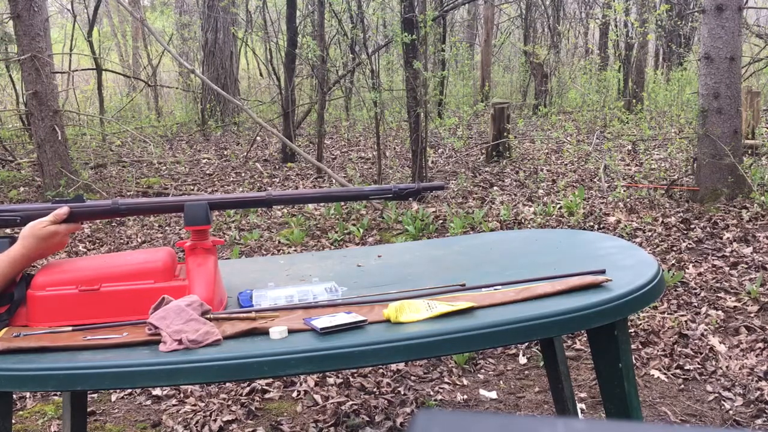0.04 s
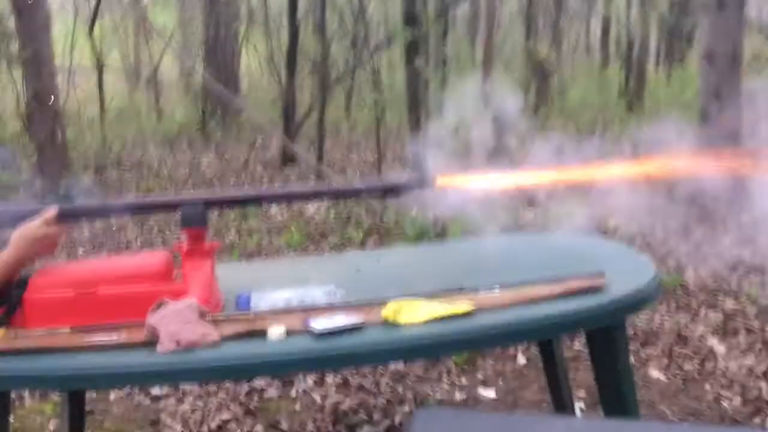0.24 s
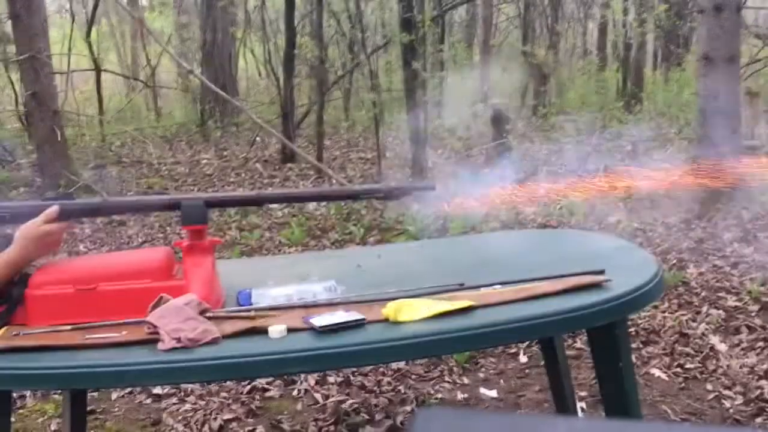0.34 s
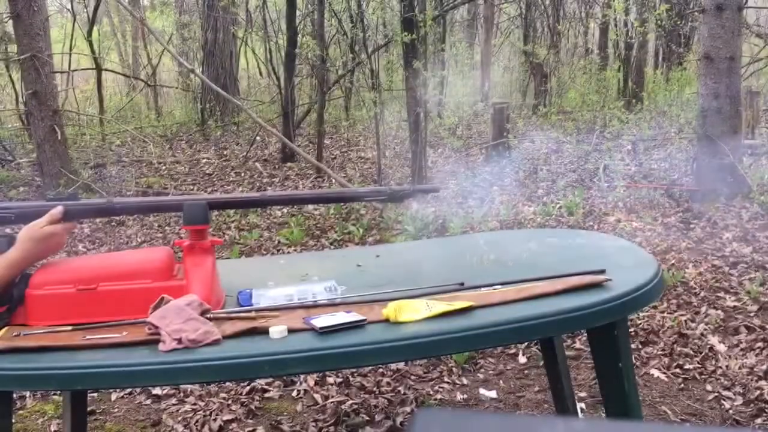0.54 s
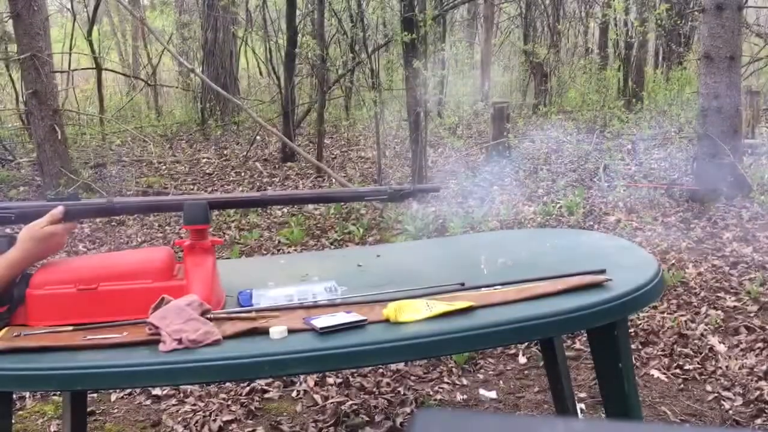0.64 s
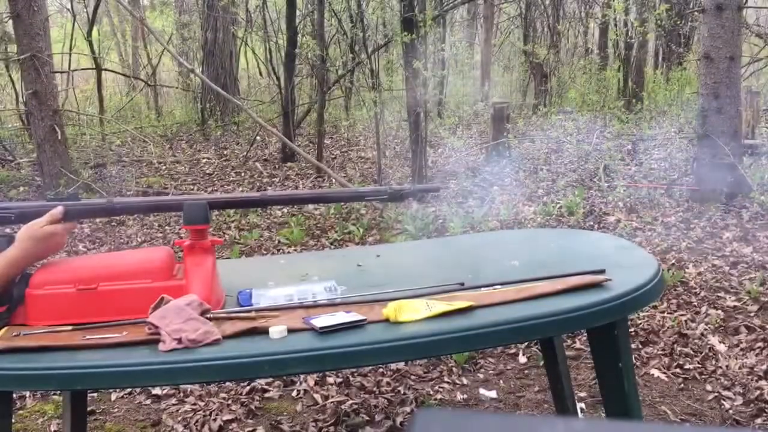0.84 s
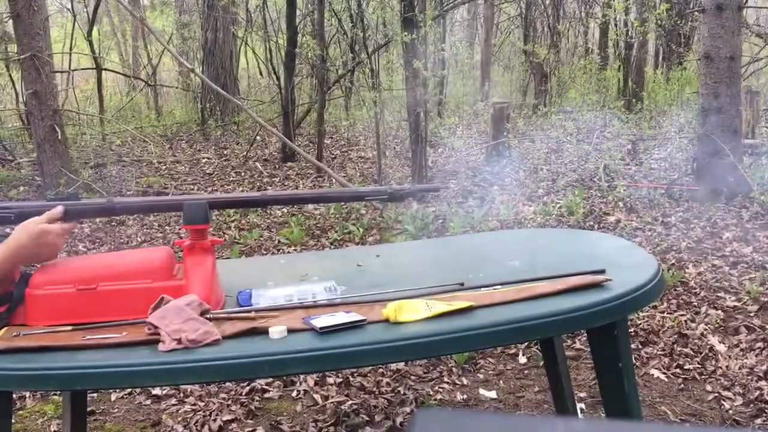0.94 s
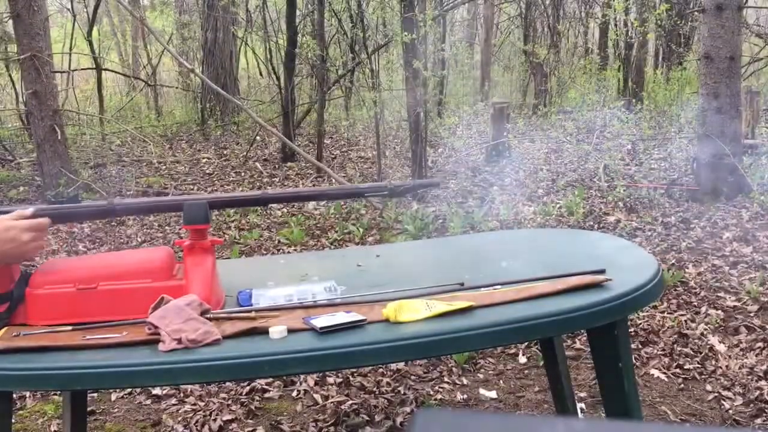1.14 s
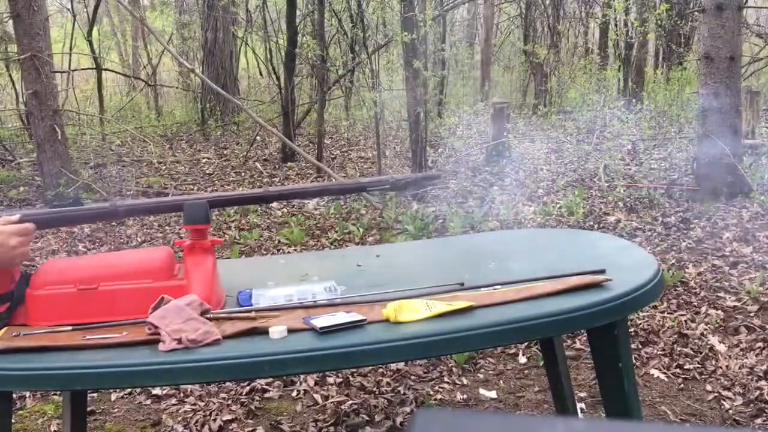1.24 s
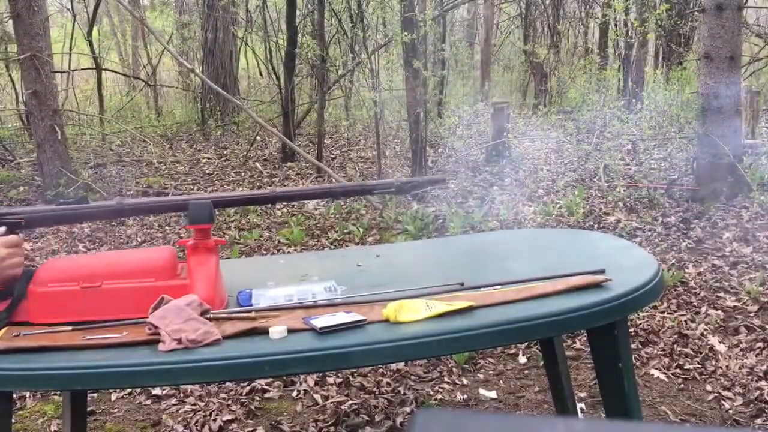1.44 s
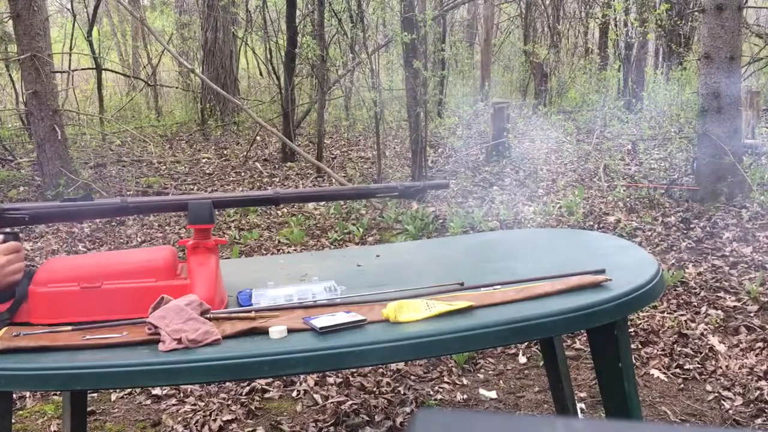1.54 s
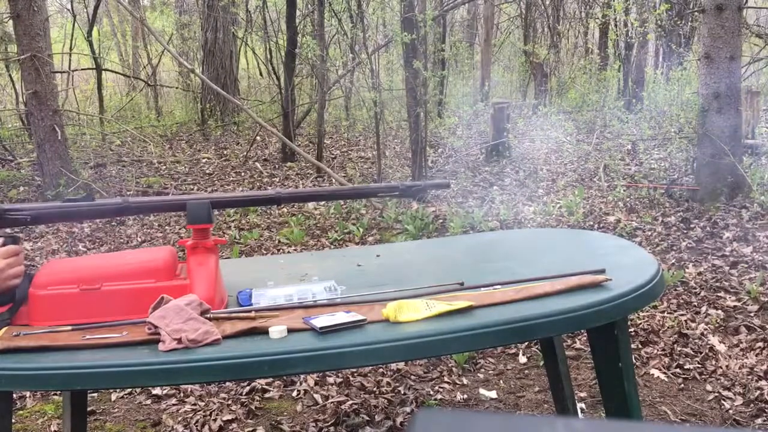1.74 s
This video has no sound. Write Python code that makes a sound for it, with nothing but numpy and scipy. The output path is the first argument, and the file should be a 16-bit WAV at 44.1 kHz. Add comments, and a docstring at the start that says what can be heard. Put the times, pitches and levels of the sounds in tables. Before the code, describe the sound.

A musket fires once outdoors, its blast rolling away among trees before a few knocks.

```python
"""Musket shot in the woods

A black powder musket fires over a garden table: the lock snaps, the priming pops, the muzzle blasts.
Near trunks and dry leaves scatter the blast, the far trees send it back and it rolls away.
The gun then knocks on its rest while a distant engine hums.
The blast overloads the microphone, whose gain control ducks and creeps back."""
import sys
import numpy as np
from scipy import signal
from scipy.fft import rfft, irfft, next_fast_len
from scipy.io import wavfile
from scipy.ndimage import map_coordinates

SR = 44100
rng = np.random.default_rng(int(sys.argv[2]) if len(sys.argv) > 2 else 0)


def output_pcm(signal):
    """Save a mono or channel-first signal as 16-bit PCM at the path in sys.argv[1].

    Samples are clipped to [-1, 1] before scaling.
    """
    pcm = np.clip(np.atleast_2d(signal).T, -1, 1) * 32767
    wavfile.write(sys.argv[1], SR, np.round(pcm).astype(np.int16))


N = 79380
TIME = np.arange(N) / SR
HIT_TIME = np.arange(SR // 4) / SR  # the life of one hit


# The crack and its duller body: (time [s], level [dB], t60 [s], treble edge [Hz])
CRACK_HITS = [(.2412, -3, .019, 16000), (.2425, -15, .18, 1800)]
# EQ of the crack: (frequency [Hz], level [dB])
CRACK_EQ = [(100, -3), (300, -1), (550, -6), (950, 0), (1250, -.5), (1700, -6), (3900, -10), (6000, -18.5),
            (16000, -22)]

def muzzle_crack():
    """The shock front, a pressure jump with a suction tail, lands together with a noisy crack."""
    shot_s, pulse_s = .2412, .0005
    age = np.maximum(TIME - shot_s, 0) / pulse_s
    front = amp(-1) * (age > 0) * (1 - age) * np.exp(-age)
    return front + bursts(CRACK_HITS, CRACK_EQ)


# The punch of the gas: (time [s], first pitch [Hz], last pitch [Hz], level [dB], t60 [s])
GAS_SURGES = [(.2355, 70, 66, -10, .12), (.2505, 70, 48, -5.5, .075), (.2702, 1000, 76, 0, .12),
              (.2985, 900, 230, -7.5, .05)]

def gas_surges():
    """Pressure swings drop in pitch as the powder gas expands."""
    glide_s = .0042
    track = np.zeros(N)
    for start, first_hz, last_hz, db, t60 in GAS_SURGES:
        hz = last_hz + (first_hz - last_hz) * np.exp(-HIT_TIME / glide_s)
        phase = 2 * np.pi * np.cumsum(hz) / SR + .3 * wobble(600, HIT_TIME)
        add(track, start, amp(db) * hit_envelope(t60, rise_s=.003) * np.sin(phase))
    return track


# Flares of the burning jet: (time [s], length [s], level [dB])
JET_FLARES = [(.2505, .008, -22.5), (.2572, .0185, -14), (.2858, .0185, -15)]
# EQ of their crackle: (frequency [Hz], level [dB])
JET_EQ = [(200, -6), (1000, -1), (2400, 2.5), (4000, -2), (6000, -2.5), (9500, -3), (10500, -8),
          (12000, -5), (16000, -11)]

def burning_jet():
    """The jet tears in short, crackling flares that start and stop abruptly."""
    fade_s, flutter_db = .0015, 2.5
    gate = sum(amp(db) * np.clip(np.minimum(TIME - start, start + length - TIME) / fade_s, 0, 1)
               for start, length, db in JET_FLARES)
    flutter = unit_rms(amp(flutter_db * wobble(500)))
    return gate * flutter * noise(JET_EQ, spikiness=.7)


# Snaps of lock and priming: (time [s], level [dB], t60 [s], treble edge [Hz])
LOCK_SNAPS = [(.218, -26.5, 0.021, 4000), (.220, -25.5, 0.02, 3000), (.2297, -29.5, 0.046, 4000),
              (.2326, -16, 0.0063, 18040)]
# EQ of the snaps: (frequency [Hz], level [dB])
LOCK_EQ = [(60, -12), (300, -2), (1000, 0), (2500, -3), (6000, -6), (16000, -5)]

def lock_and_priming():
    """The lock snaps and the priming pops just ahead of the blast."""
    return bursts(LOCK_SNAPS, LOCK_EQ)


# Early reflections: (start [s], rise [s], hold [s], level [dB], spikiness)
NEAR_SWELL = (0.24, .05, .02, -10.5, .55)
# Their EQ: (frequency [Hz], level [dB])
NEAR_EQ = [(20, -14), (45, 0), (90, 1), (170, 2), (280, .5), (520, -9.5), (1000, -3.5), (1700, -9.5),
           (2700, -9), (5000, -14), (9500, -17.5), (10500, -24), (12000, -19.5), (16000, -28)]
# Their decay: (frequency [Hz], t60 [s])
NEAR_DECAY = [(50, .17), (300, .25), (1200, 0.35), (3000, .33), (7000, .27), (14000, .2)]

def near_trees():
    """Near trunks and dry leaves scatter the blast into a dense, short wash."""
    return scatter(NEAR_SWELL, NEAR_EQ, NEAR_DECAY)


# Echo off the far trees: (start [s], rise [s], hold [s], level [dB], spikiness)
FAR_SWELL = (0.42, 0.08, 0.0482, -35, 0.68)
# Its EQ: (frequency [Hz], level [dB])
FAR_EQ = [(25, -23), (55, -7), (110, -6), (180, -6), (330, -9), (600, -6.5), (1100, -7), (1700, -10.5),
          (2800, -10), (4500, -19), (8000, -28.5), (16000, -55)]
# Its decay: (frequency [Hz], t60 [s])
FAR_DECAY = [(60, .9), (200, 0.85), (1000, 1), (3000, 0.74), (7000, .55), (14000, .45)]
# Bass thumps off the tree line: (time [s], level [dB], t60 [s], treble edge [Hz])
TREE_THUMPS = [(.478, -31, 0.27, 900), (.515, -34, 0.27, 400), (.565, -34, 0.27, 400)]
# EQ of the thumps: (frequency [Hz], level [dB])
THUMP_EQ = [(25, -28), (52, -3), (80, -9), (130, -3.5), (195, 2.5), (280, -8.5), (600, -15), (2000, -45),
            (16000, -100)]
# Slapback off single trunks: (time [s], level [dB], t60 [s], treble edge [Hz])
TRUNK_SLAPS = [(.546, -27.5, 0.034, 4040), (.577, -33, .02, 7960)]
# EQ of the slaps: (frequency [Hz], level [dB])
SLAP_EQ = [(100, -13), (1000, -8), (3000, 3), (4500, -12), (16000, -19)]

def far_trees():
    """The far trees send the blast back as a diffuse echo, low thumps and bright slaps."""
    echo = scatter(FAR_SWELL, FAR_EQ, FAR_DECAY)
    return echo + bursts(TREE_THUMPS, THUMP_EQ, rise_s=.0041) + bursts(TRUNK_SLAPS, SLAP_EQ)


# The long tail of the woods: (start [s], rise [s], hold [s], level [dB], spikiness)
ROLL_SWELL = (0.34, 0.18, 0.1673, -39.5, 0.33)
# Its EQ: (frequency [Hz], level [dB])
ROLL_EQ = [(25, -32), (70, -7), (110, 4), (200, -4.5), (400, -7), (650, -6), (1000, 1), (1300, -4.5),
           (1700, -8), (2400, -7.5), (3500, -16), (5000, -27.5), (8000, -42), (16000, -71)]
# Its decay: (frequency [Hz], t60 [s])
ROLL_DECAY = [(100, 3.2), (400, 4.9), (1000, 4.57), (2400, 2.73), (5000, 1.73), (10000, 1.3)]

def rolling_tail():
    """The scattered blast rolls away through the woods, losing its treble first."""
    return scatter(ROLL_SWELL, ROLL_EQ, ROLL_DECAY)


# Clacks of the gun on its rest: (time [s], level [dB], t60 [s], treble edge [Hz])
GUN_CLACKS = [(1.322, -42, 0.1, 10000), (1.336, -36, 0.08, 7000), (1.352, -33, .02, 14000),
              (1.367, -31, 0.038, 12000), (1.3702, -24, 0.047, 7100), (1.3775, -27, 0.046, 3500),
              (1.394, -37, .11, 4000), (1.44, -44, 0.082, 4000), (1.7115, -40.5, 0.06, 1510),
              (1.724, -41.5, 0.038, 5970)]
# EQ of the clacks: (frequency [Hz], level [dB])
CLACK_EQ = [(60, -15), (200, -6), (360, -2.5), (520, -9.5), (810, 3.5), (980, -4.5), (1240, 1),
            (1650, -21.5), (2350, -10), (3100, -20.5), (4400, -22.5), (9000, -24), (16000, -36)]
# Faint ring of the steel: (time [s], pitch [Hz], level [dB], t60 [s])
STEEL_RINGS = [(1.37, 10950, -68, .25), (1.37, 15200, -69, .17)]
# Thuds of the table: (time [s], pitch [Hz], level [dB], t60 [s])
TABLE_THUDS = [(1.3345, 260, -27, 0.049), (1.341, 355, -30, 0.075), (1.3702, 785, -27, .07),
               (1.6772, 340, -21, .011), (1.6845, 290, -24.5, .015), (1.694, 95, -40, .1)]

def gun_on_rest():
    """Drawn back over its rest, the gun clacks, its steel rings and the table thuds under it."""
    clacks = bursts(GUN_CLACKS, CLACK_EQ, rise_s=.00048)
    steel = damped_tones(STEEL_RINGS, rise_s=.001, jitter_rad=.9)
    table = damped_tones(TABLE_THUDS, rise_s=.00085, jitter_rad=.25)
    return clacks + steel + table


# Swish of cloth: (start [s], rise [s], hold [s], level [dB], spikiness)
SLEEVE_SWELL = (1.49, .17, .05, -67.5, .7)
# Its EQ: (frequency [Hz], level [dB])
SLEEVE_EQ = [(500, -27), (3000, -2.5), (7000, -1.5), (11000, -9.5), (16000, -18)]
# Its decay: (frequency [Hz], t60 [s])
SLEEVE_DECAY = [(5000, .15)]

def sleeve():
    """A sleeve slides with a faint, grainy hiss."""
    return scatter(SLEEVE_SWELL, SLEEVE_EQ, SLEEVE_DECAY)


# Small ticks: (time [s], level [dB], t60 [s], treble edge [Hz])
TICK_HITS = [(.4499, -49, .018, 14000), (.6935, -64, .015, 14000), (1.5344, -54, .012, 16000)]
# EQ of the ticks: (frequency [Hz], level [dB])
TICK_EQ = [(1000, -30), (7000, -16), (11000, -2), (16000, 3)]

def ticks():
    """Three tiny, bright ticks dot the tail of the shot."""
    return bursts(TICK_HITS, TICK_EQ)


# EQ of the outdoor air: (frequency [Hz], level [dB])
AIR_EQ = [(20, -28), (50, -9), (95, 2), (135, -8.5), (195, -8.5), (250, -17.5), (500, -23), (950, -21.5),
          (1300, -31.5), (1900, -47), (6000, -50), (16000, -56)]

def engine_and_air():
    """A distant engine hums, wavering in pitch and level, over a bed of quiet outdoor air."""
    hum_hz, hum_db, waver_db, air_db = 87.3, -50, 2, -51.5
    hz = hum_hz * (1 + .05 * wobble(12.02))
    hum = amp(hum_db + waver_db * wobble(14)) * np.sin(2 * np.pi * np.cumsum(hz) / SR)
    return hum + amp(air_db) * noise(AIR_EQ)


def bursts(hits, eq, rise_s=.00022):
    """Noise hits that share one EQ, each with its own treble roll-off."""
    track, hz = np.zeros(N), np.fft.rfftfreq(len(HIT_TIME), 1 / SR)
    gain = amp(curve_at(eq, hz))
    for start, db, t60, edge_hz in hits:
        white = rfft(rng.standard_normal(len(HIT_TIME)))
        grit = irfft(white * gain / np.hypot(1, (hz / edge_hz) ** 2), len(HIT_TIME))
        add(track, start, amp(db) * hit_envelope(t60, rise_s) * unit_rms(grit))
    return track


def damped_tones(hits, rise_s, jitter_rad):
    """Struck resonances, roughened by an unsteady phase."""
    track = np.zeros(N)
    for start, hz, db, t60 in hits:
        phase = 2 * np.pi * hz * HIT_TIME + jitter_rad * wobble(min(2 * hz, 900), HIT_TIME)
        add(track, start, amp(db) * hit_envelope(t60, rise_s) * np.sin(phase))
    return track


def scatter(swell, eq, decay):
    """A crowd of small arrivals swells and holds, then each frequency dies at its own speed."""
    start, rise, hold, db, spikiness = swell
    hz, t, spectra = signal.stft(noise(eq, spikiness), SR, nperseg=512)
    release_s = np.maximum(t - start - rise - hold, 0)
    fade = np.exp(-np.log(1000) * release_s / curve_at(decay, hz)[:, None])
    wash = signal.istft(spectra * fade, SR, nperseg=512)[1][:N]
    return amp(db) * np.clip((TIME - start) / rise, 0, 1) * wash


def noise(eq, spikiness=0):
    """Coloured noise of rms 1; spikiness lets single grains stand out."""
    grains = rng.standard_normal(N) * np.exp(spikiness * np.clip(rng.standard_normal(N), -3, 3))
    return unit_rms(filtered(grains, lambda hz: amp(curve_at(eq, hz))))


def hit_envelope(t60, rise_s):
    """Quick attack, then a free decay."""
    return (1 - np.exp(-HIT_TIME / rise_s)) * np.exp(-np.log(1000) * HIT_TIME / t60)


def wobble(knots_per_s, time=TIME):
    """A smooth random curve."""
    return map_coordinates(rng.standard_normal(len(time) // 20), [time * knots_per_s + 2])


def filtered(x, response):
    """Shape x with a gain that depends on frequency."""
    size = next_fast_len(N + 8192)
    return irfft(rfft(x, size) * response(np.fft.rfftfreq(size, 1 / SR)), size)[..., :N]


def curve_at(points, hz):
    """Read a breakpoint curve on a log frequency axis."""
    point_hz, values = np.transpose(points)
    return np.interp(np.log(hz + 1), np.log(point_hz + 1), values)


def amp(db):
    return 10 ** (np.asarray(db) / 20)


def unit_rms(x):
    return x / np.sqrt(np.mean(x ** 2) + 1e-20)


def add(track, start_s, sound):
    part = track[round(start_s * SR):][:len(sound)]
    part += sound[:len(part)]


def scene():
    """The mono mix at the microphone: shot, woods, handling and background."""
    shot = lock_and_priming() + muzzle_crack() + burning_jet() + gas_surges()
    woods = far_trees() + near_trees() + rolling_tail()
    return (shot + woods + gun_on_rest() + sleeve() + ticks() + engine_and_air())[None]


def record(dry):
    """The gain ducks under the blast and creeps back; peaks saturate; the very top is cut."""
    threshold_db, release_db_per_s, detector_s = -13.4, 3.5, .015
    clip_level, cutoff_hz = .64, 15850
    pole = np.exp(-1 / (detector_s * SR))
    power = signal.lfilter([1 - pole], [1, -pole], dry[0] ** 2)
    over_db = np.maximum(10 * np.log10(np.abs(power) + 1e-12) - threshold_db, 0)
    release_db = release_db_per_s * TIME
    duck_db = np.maximum.accumulate(over_db + release_db) - release_db
    ducked = dry * amp(-duck_db)
    saturated = ducked / (1 + (ducked / clip_level) ** 4) ** (1 / 4)
    return filtered(saturated, lambda hz: 1 / np.hypot(1, (hz / cutoff_hz) ** 90))


dry = scene()
out = record(dry)
output_pcm(out)
```